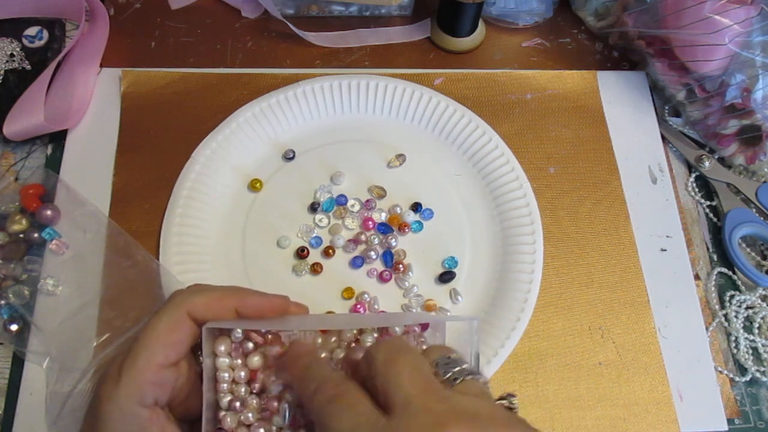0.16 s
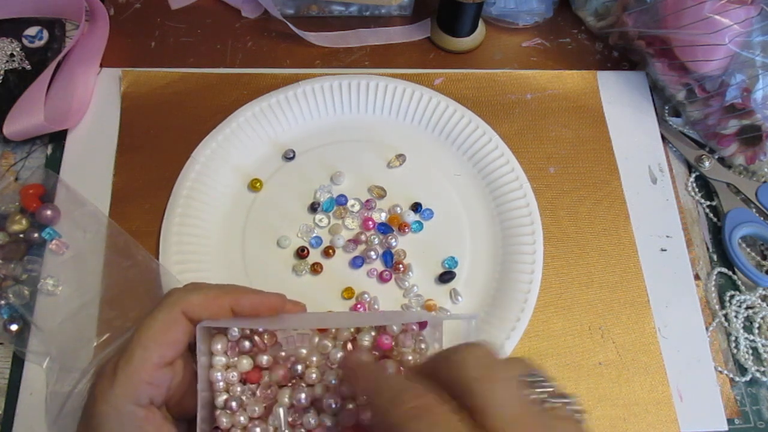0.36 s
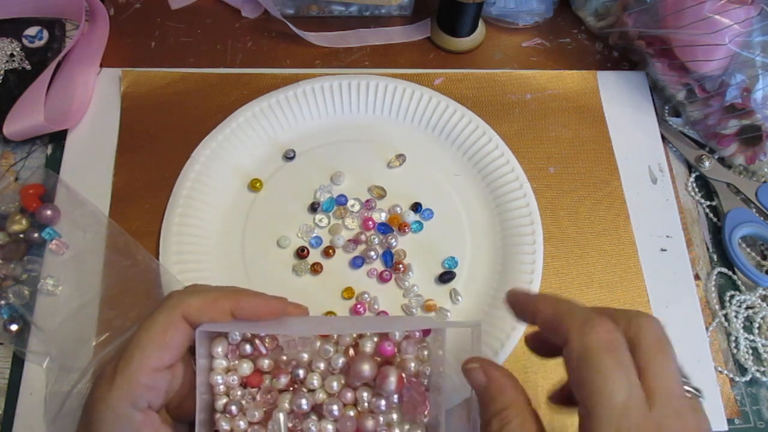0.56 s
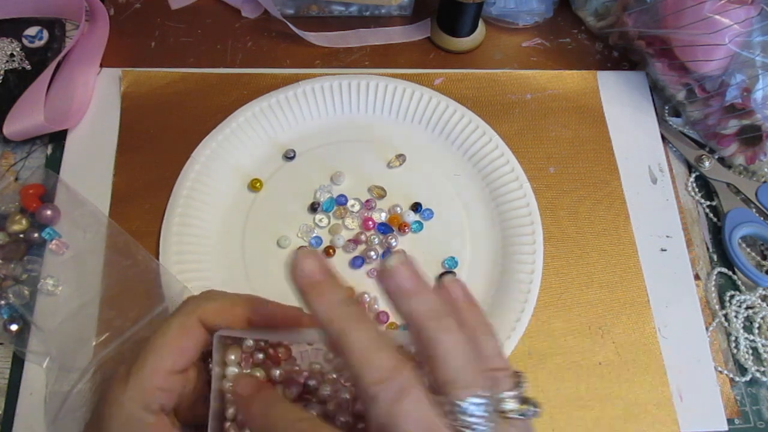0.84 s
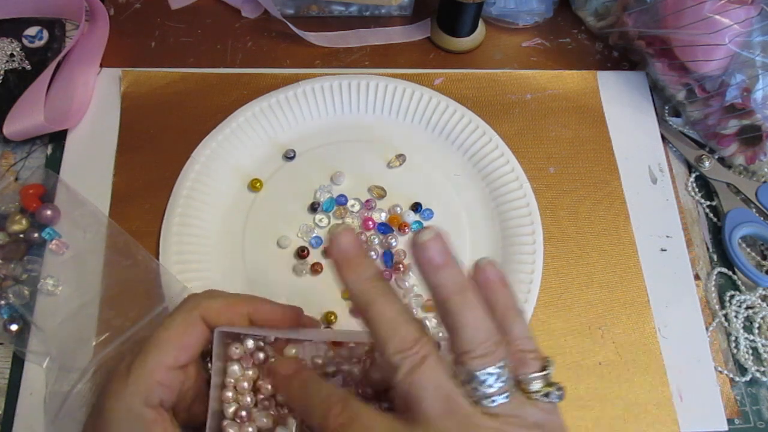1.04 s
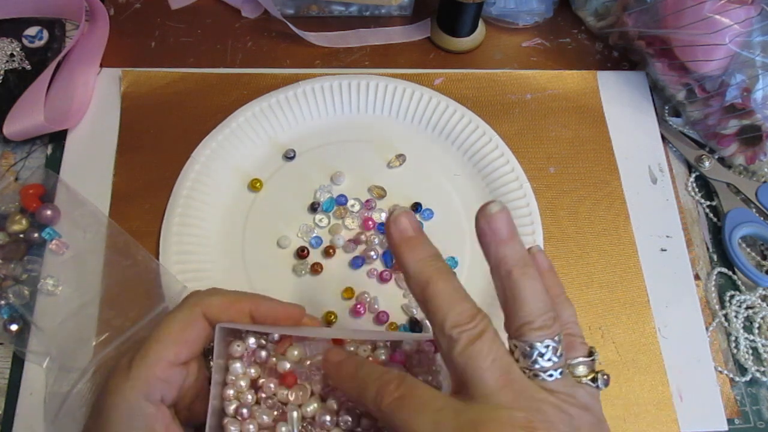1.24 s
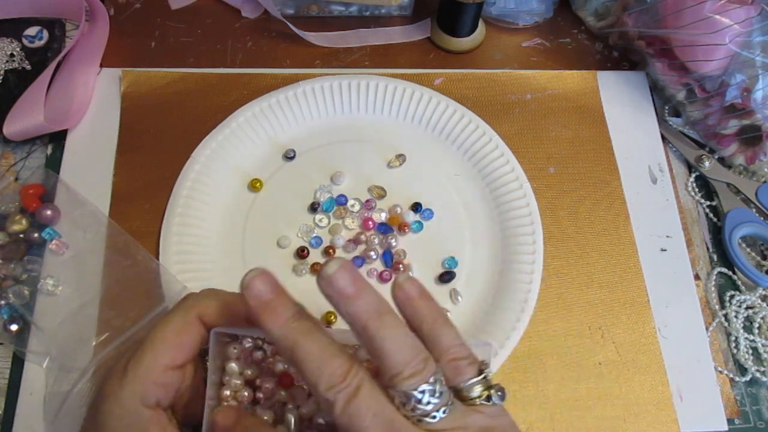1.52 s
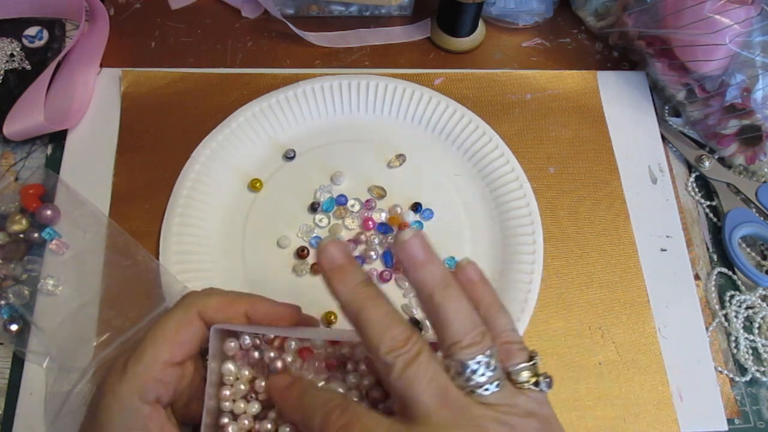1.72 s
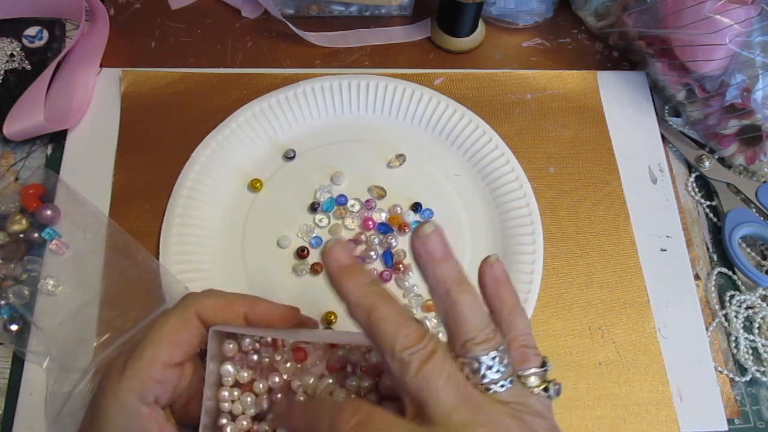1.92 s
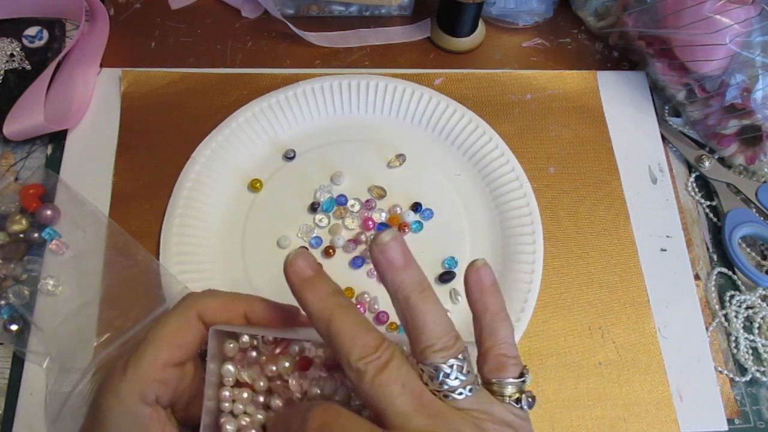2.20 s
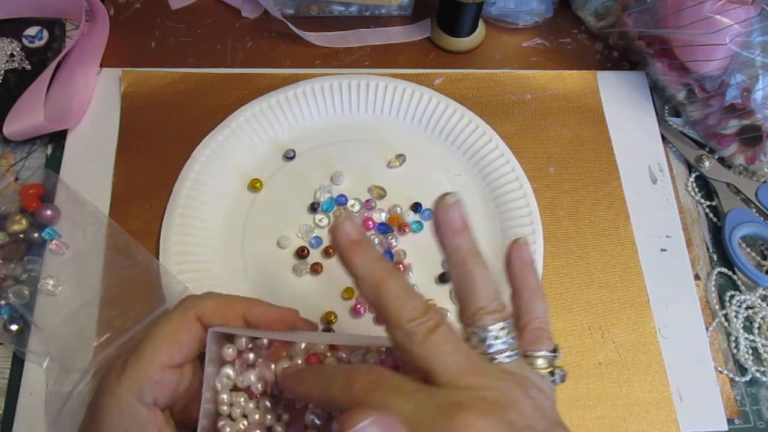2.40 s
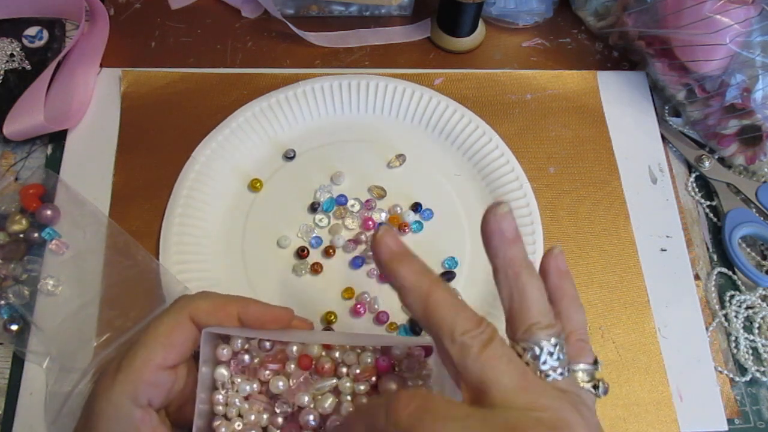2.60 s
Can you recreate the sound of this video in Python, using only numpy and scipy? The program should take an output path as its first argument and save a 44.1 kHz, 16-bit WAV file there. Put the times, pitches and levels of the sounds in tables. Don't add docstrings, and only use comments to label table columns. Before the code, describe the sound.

Pearl beads clatter in a small plastic box, very close and dry. Fingers stir at once until about 0.5 s, with a dull table thud near 0.4, then again from 0.9 to 1.3, 1.5 to 2.1, and 2.17 to 2.75. Each stir is a dense patter of bright ticks, short hollow knocks and tiny high pings, thinning out. Faint hiss and low rumble fill the quiet gaps.

```python
import sys
import numpy as np
from scipy import signal
from scipy.fft import rfft, irfft
from scipy.io import wavfile
from scipy.ndimage import uniform_filter1d

SR = 44100
rng = np.random.default_rng(int(sys.argv[2]) if len(sys.argv) > 2 else 0)


def wav_out(sig):
    wavfile.write(sys.argv[1], SR, np.round(np.clip(np.atleast_2d(sig).T, -1, 1) * 32767).astype(np.int16))


def level_to_linear(level):
    exponent = np.asarray(level, float) / 20
    return 10 ** exponent


N = 121275

# start_s, knock_db (on the box), tick_db (of the beads, over the knock)
FIRST_STIR = [(0.0011, -13.5, 6.5), (0.0333, -10, -1.5), (0.0393, -13.5, 5), (0.0941, -12.5, -2.5),
              (0.113, -10.5, 7), (0.1324, -4.5, 0.5), (0.1459, -9.5, -3), (0.1501, -13.5, 11),
              (0.1678, 1.5, -8), (0.1757, -33, 0), (0.182, -11.5, 7.5), (0.1963, -4.5, -2),
              (0.2167, -12, 7.5), (0.2242, -31, 17), (0.2398, -34, 25), (0.2456, -4.5, 3.5),
              (0.2721, -10.5, 2), (0.2943, -20, 9), (0.3108, -36, 24.5), (0.3224, -20, 6),
              (0.3378, -34.5, 23.5), (0.3562, -26.5, 12.5), (0.3863, -22, 7), (0.4179, -21.5, 10.5),
              (0.4866, -28.5, 6.5), (0.5293, -38, 9), (0.7471, -48.5, 14)]
SECOND_STIR = [(0.9198, -16.5, 7), (0.9282, -12.5, 4), (0.969, -18.5, 10), (0.9808, -20, 8),
               (0.9925, -28, 20), (0.9988, -8.5, 4.5), (1.0037, -13, 13.5), (1.013, -18, 12),
               (1.027, -18, -6), (1.049, -8, 7), (1.0562, -5, 6.5), (1.0638, -14.5, 13.5),
               (1.071, -6.5, -11), (1.0861, -27, 1), (1.0924, -4.5, -18), (1.1088, -3, -14),
               (1.1202, -40, 3), (1.1279, -14.5, 10.5), (1.1337, -14, 6), (1.1521, -19.5, 10.5),
               (1.1744, -18, 5), (1.1989, -15, 7), (1.2162, -17, 0), (1.2226, -20, 10), (1.2365, -22.5, 7),
               (1.256, -29.5, 10), (1.3091, -19, 10), (1.3206, -33.5, 18)]
THIRD_STIR = [(1.521, -4.5, 4.5), (1.563, -8, 6), (1.5778, 1.5, -1.5), (1.597, -5, -9), (1.6117, -10, 9),
              (1.6225, -10, -3), (1.6327, -8.5, 3), (1.6367, -12, 6), (1.656, -12, 6), (1.6638, -8.5, 3),
              (1.6961, -13, 5), (1.7195, -11, 8.5), (1.7227, -12, -11), (1.7732, -17.5, 10),
              (1.807, -18, 9), (1.8496, -12, -2), (1.87, -24, 20), (1.872, 4, -7.5), (1.8881, -6.5, 2),
              (1.9042, -4, -17), (1.9478, -8, 1), (1.9537, -14, 6), (1.958, -13.5, 5.5),
              (1.9933, -21.5, 10.5), (2.0198, -26.5, 9), (2.0327, -20, 10), (2.0493, -16.5, 1.5),
              (2.07, -22.5, 6), (2.0833, -12.5, 5)]
FOURTH_STIR = [(2.1717, -11, 7), (2.1822, -7.5, -11), (2.189, -5, -10), (2.1934, -15, 5), (2.23, -14, 4),
               (2.243, -10, 2), (2.248, -13.5, -3), (2.267, -50, 16), (2.2889, -13, 2), (2.3089, -9.5, 1),
               (2.3169, -13.5, 3), (2.3245, -11, 2), (2.3526, -5.5, 4), (2.3617, -22, 7),
               (2.3795, -14.5, 5), (2.3906, -16, 6.5), (2.4209, -23, 9), (2.4387, -10, 3.5),
               (2.456, -1.5, -1.5), (2.4808, -11.5, -18), (2.4984, -21.5, 7.5), (2.518, -7, 3),
               (2.5325, -19.5, 11.5), (2.5671, -28.5, 8.5), (2.642, -30.5, 13), (2.6804, -15.5, 10),
               (2.695, -44, 27), (2.706, -20, 7.5), (2.7467, -26, 12)]
# start_s, knock_db, tick_db (over the knock)
FURTHER_HITS = [(.0281, -28, -1), (.0911, -22.5, 7), (.371, -39, 11), (.3797, -36, 17), (.436, -36, 4),
                (.441, -35, 7), (.9845, -15, 4), (1.043, -17, 1), (1.066, -10.5, 4), (1.162, -24, 8),
                (1.5168, -23.5, 14), (1.571, -18, 12), (1.646, -11.5, 11), (1.672, -12.5, 9), (1.706, -27, 8),
                (1.75, -20, 10), (1.759, -12.5, 4), (1.7768, -13, 6), (1.794, -22, 10), (1.845, -20, 3),
                (1.938, -19, -3), (2.045, -20, 7), (2.058, -24, 2.5), (2.372, -13, 1), (2.453, -12, 8)]
# start_s, level_db, pitch_hz
PEARL_PINGS = [(0.0935, -28, 8160), (0.1128, -22, 9100), (0.1326, -20, 8450), (0.1495, -16, 8800),
               (0.2164, -26, 8380), (0.2239, -23, 8450), (0.245, -18, 7900), (0.294, -21, 8500),
               (0.3785, -35, 7950), (0.418, -18.5, 8300), (0.4855, -26, 10000), (0.919, -22, 7950),
               (0.9671, -16.5, 8700), (1.0624, -11, 8400), (1.1982, -27, 7950), (1.2216, -25, 7720),
               (1.2474, -29, 7990), (1.3199, -34, 7820), (1.3493, -42, 7820), (1.5214, -10, 8060),
               (1.5524, -23, 8690), (1.5627, -18, 7430), (1.5777, -12, 8170), (1.5956, -16, 8700),
               (1.6565, -17.5, 8600), (1.719, -19, 8550), (1.7494, -17, 7950), (1.7764, -12.5, 9000),
               (1.8066, -21.5, 8030), (1.849, -21.5, 8800), (1.8711, -20, 8760), (1.9372, -24, 8150),
               (1.948, -18, 9100), (2.1186, -30, 8070), (2.1271, -31, 8380), (2.1927, -11.5, 8300),
               (2.2288, -18.5, 9380), (2.309, -20.5, 8040), (2.369, -21, 8600), (2.4378, -18, 9360),
               (2.4978, -29, 9440), (2.518, -18, 8300), (2.6415, -28, 9480), (2.6806, -23, 9060)]
# start_s, level_db, pitch_hz
LARGE_PEARL_PINGS = [
    (.7465, -49.5, 2750),
    (1.3085, -21.5, 3220),
    (2.695, -36, 5000),
]
# time_s, level_db
FINGER_PUSH = [
    [(0, -51), (.04, -34), (.085, -48.5), (.13, -34), (.21, -26), (.28, -39.5), (.41, -53), (.445, -51),
     (.48, -65.5)],
    [(.89, -63), (.935, -45), (.96, -41.5), (1.0, -27), (1.07, -22), (1.14, -29), (1.22, -42), (1.3, -44),
     (1.41, -59.5)],
    [(1.505, -60), (1.53, -36), (1.6, -23), (1.69, -29), (1.78, -29.5), (1.84, -42), (1.89, -33.5),
     (1.99, -41), (2.11, -45.5)],
    [(2.165, -37), (2.2, -21), (2.28, -37.5), (2.33, -25), (2.43, -35), (2.53, -36.5), (2.62, -62.5),
     (2.68, -67), (2.72, -36.5)],
]
# pitch_hz, level_db, fade_s (time to fall 60 dB)
BOX_NOTES = [(685, -3.5, 0.0025), (1260, -14, 0.026), (1451, -2.5, 0.016), (1604, -2.5, 0.0093),
             (1514, -17.5, 0.02), (2075, -15, 0.021), (2495, -15.5, 0.014), (2760, -22.5, 0.06),
             (2950, -68, 0.022)]
# pitch_hz, level_db, fade_s (time to fall 60 dB)
BEAD_NOTES = [(2500, -9, 0.0049), (3080, -5.5, 0.0036), (3670, -20, 0.022), (4574, -7.5, 0.0036),
              (5600, -6, 0.0024), (6760, -8, 0.0025), (8500, -8.5, 0.0021), (9470, -10.5, 0.0026),
              (9720, -53, 0.0037), (11900, -18, 0.0012), (14670, -24, 0.001)]
# start_s, level_db
FINGER_THUDS = [
    (.222, -32),
    (2.706, -42),
]
# pitch_hz, level_db, fade_s (time to fall 60 dB)
WALL_NOTE = [(490, 0, .035)]
# pitch_hz, level_db (per Hz)
BUMP_COLOUR = [(28, -16), (70, 0), (200, -11), (800, -38)]
# pitch_hz, level_db (per Hz)
HISS_COLOUR = [(120, -25), (200, -4.5), (696, -7), (777, -7.5), (9930, -38), (16000, -42)]
# pitch_hz, level_db (per Hz)
RUMBLE_COLOUR = [(25, -4), (50, -5.5), (100, -1), (250, -10.5), (700, -29.5)]
# time_s, level_db
RUMBLE_LOUDNESS = [(0, -58.5), (.6, -59.5), (1.5, -55.5), (1.8, -62), (2.75, -65)]

BOX_VARIES_DB, BEAD_VARIES_DB = 1, 2.5
DETUNE = 0.012


def strike(at, size, modes, varies_db, smear_s=0):
    luck = rng.standard_normal((N, len(modes)))
    late = rng.random((N, len(modes)))
    tuning = rng.integers(-1, 2, (N, len(modes)))
    detune = DETUNE * (3 if smear_s else 1)
    out = 0
    for k, (hz, db, t60) in enumerate(modes):
        clicks = np.full((3, N + SR), 1e-18)
        sign = np.where(late[at, k - 1] < 0.5, -1, 1) if smear_s else -1
        when = at + (smear_s * SR * late[at, k] ** 2).astype(int)
        share = level_to_linear(db + varies_db * np.clip(luck[at, k], -2, 1))
        np.add.at(clicks, (tuning[at, k], when), sign * size * share)
        r = level_to_linear(-60 / (t60 * SR))
        for step in (-1, 0, 1):
            w = 2 * np.pi * hz * (1 + detune * step) / SR
            ring = signal.lfilter([0, np.sin(w)], [1, -2 * r * np.cos(w), r * r], clicks[step, :N])
            out = out + ring
    return out


def hits():
    every_hit = FIRST_STIR + SECOND_STIR + THIRD_STIR + FOURTH_STIR + FURTHER_HITS
    start_s, knock_db, tick_db = np.transpose(every_hit)
    at = (start_s * SR).astype(int)
    knocks = strike(at, level_to_linear(knock_db - 6.5), BOX_NOTES, BOX_VARIES_DB)
    ticks = strike(at, level_to_linear(knock_db + tick_db - 5), BEAD_NOTES, BEAD_VARIES_DB, smear_s=0.0012)
    dull = signal.butter(2, 7000, fs=SR)
    return knocks + signal.lfilter(*dull, ticks)


def rms_one(x):
    return x / np.sqrt(np.mean(x ** 2) + 1e-20)


def drift(rate_hz):
    r = np.exp(-2 * np.pi * rate_hz / SR)
    wander = signal.lfilter([1], [1, -2 * r, r * r], rng.standard_normal(N + SR))
    return rms_one(wander[SR:])


def patter():
    knocks_per_s, ticks_per_knock = 450, 2.5
    spread_db, clump_db, clump_hz = 3.6, 2.5, 53
    level_db, tick_db = -3, 0.5
    time_s, push_db = np.transpose([row for stir in FINGER_PUSH for row in stir])
    knock_chance, tick_chance = rng.random((2, N))
    on_box = np.flatnonzero(knock_chance < knocks_per_s / SR)
    on_bead = np.flatnonzero(tick_chance < ticks_per_knock * knocks_per_s / SR)

    sizes = level_to_linear(spread_db * np.minimum(rng.exponential(1, (2, N)), 3))
    sizes = sizes * rng.choice([-1, 1], (2, N)) * level_to_linear(clump_db * drift(clump_hz))
    knocks = rms_one(strike(on_box, sizes[0, on_box], BOX_NOTES, BOX_VARIES_DB))
    ticks = rms_one(strike(on_bead, sizes[1, on_bead], BEAD_NOTES, BEAD_VARIES_DB, smear_s=0.0018))
    push = level_to_linear(np.interp(np.arange(N) / SR, time_s, push_db) + level_db)
    return push * (knocks + level_to_linear(tick_db) * ticks)


def pings():
    late_s, level_db = 0.0005, 8.5
    fade_cycles, rise_cycles = 23.7, 1.18
    overtone_ratio, overtone_db = 1.4, -14
    start_s, db, hz = np.transpose(PEARL_PINGS + LARGE_PEARL_PINGS)[:, :, None]
    step = np.arange(SR // 50)
    cycles = hz * step / SR
    fade = level_to_linear(db + level_db - 60 * cycles / fade_cycles)
    swell = 1 - np.exp(-cycles / rise_cycles)
    main_tone = np.sin(2 * np.pi * cycles)
    overtone = level_to_linear(overtone_db) * np.sin(2 * np.pi * overtone_ratio * cycles)
    out = np.zeros(N + SR)
    first = ((start_s + late_s) * SR).astype(int)
    np.add.at(out, first + step, fade * swell * (main_tone + overtone))
    return out[:N]


def echo(x, db, t60, cut_hz):
    t = np.arange(SR // 3) / SR
    place = np.repeat(rng.integers(0, 4, N // 512 + 1), 512)[:N]
    dull = signal.butter(1, cut_hz, fs=SR)
    fade = level_to_linear(-60 * t / t60) * np.clip(t / 0.00068, 0, 1)
    out = 0
    for k, noise in enumerate(rng.standard_normal((4, len(t)))):
        tail = signal.lfilter(*dull, noise * fade)
        tail = tail / np.sqrt(np.sum(tail ** 2))
        share = np.sqrt(np.abs(uniform_filter1d(1.0 * (place == k), size=128)))
        out = out + signal.fftconvolve(x * share, tail)[:N]
    return level_to_linear(db) * out


def finger_thuds():
    start_s, db = np.transpose(FINGER_THUDS)
    knocks = strike((start_s * SR).astype(int), level_to_linear(db), WALL_NOTE, 0)
    return uniform_filter1d(knocks, size=30)


def coloured(spectrum):
    hz, db = np.transpose(spectrum)
    axis = np.maximum(np.fft.rfftfreq(N, 1 / SR), 1)
    shape = level_to_linear(np.interp(np.log(axis), np.log(hz), db))
    return rms_one(irfft(rfft(rng.standard_normal(N)) * shape, N))


def bump():
    start_s, level_db, rise_s, t60 = 0.408, -34, 0.04, 0.5
    table_late_s, table_db, table_hz = 0.0226, 2.5, 58.2
    t = np.maximum(np.arange(N) / SR - start_s, 0)
    loudness = level_to_linear(level_db - 60 * t / t60) * np.clip(t / rise_s, 0, 1)
    swing = np.sin(2 * np.pi * table_hz * np.maximum(t - table_late_s, 0))
    return loudness * (coloured(BUMP_COLOUR) + level_to_linear(table_db) * swing)


def hush():
    time_s, db = np.transpose(RUMBLE_LOUDNESS)
    hiss = level_to_linear(-58.5) * coloured(HISS_COLOUR)
    rumble = level_to_linear(np.interp(np.arange(N) / SR, time_s, db)) * coloured(RUMBLE_COLOUR)
    return hiss + rumble


def scene():
    high = pings()
    low_cut = signal.butter(3, 1012, "high", fs=SR, output="sos")
    beads = signal.sosfilt(low_cut, hits() + patter())
    spread = beads + level_to_linear(-7) * high
    near = echo(spread, db=-6, t60=0.077, cut_hz=11900)
    far = echo(spread, db=-38, t60=0.35, cut_hz=5400)
    mix = beads + high + near + far + finger_thuds() + bump() + hush()
    return mix[None]


def roll_off(x):
    return signal.sosfilt(signal.butter(12, 16400, fs=SR, output="sos"), x)


def record(dry):
    top_cut = signal.cheby2(12, 60, 16350, fs=SR, output="sos")
    mix = np.clip(signal.sosfilt(top_cut, dry), -1, 1)
    return roll_off(mix)


dry = scene()
out = record(dry)
wav_out(out)
```